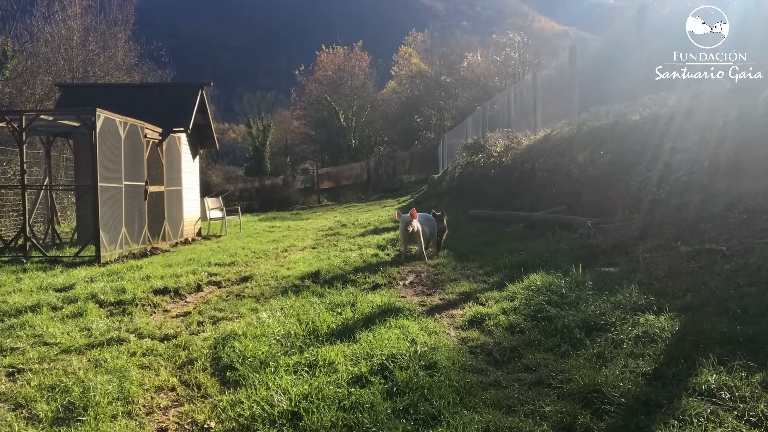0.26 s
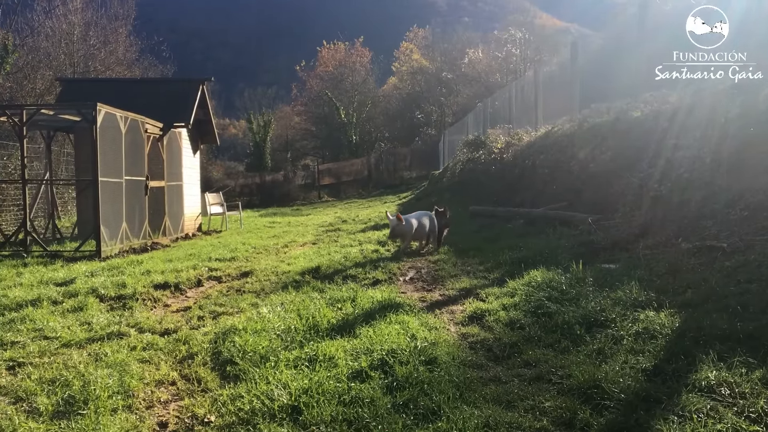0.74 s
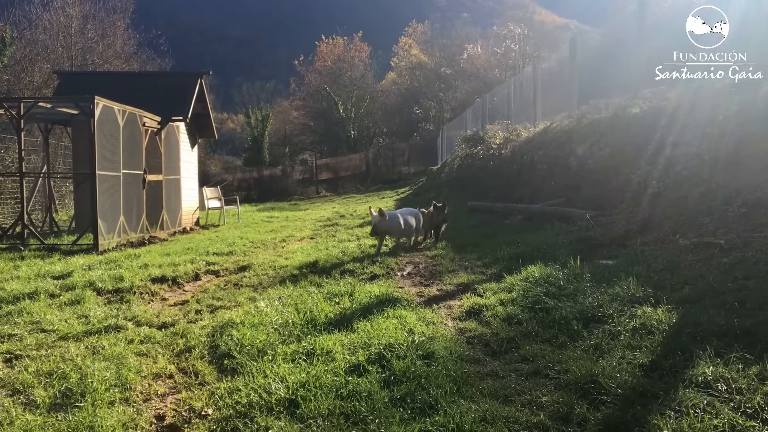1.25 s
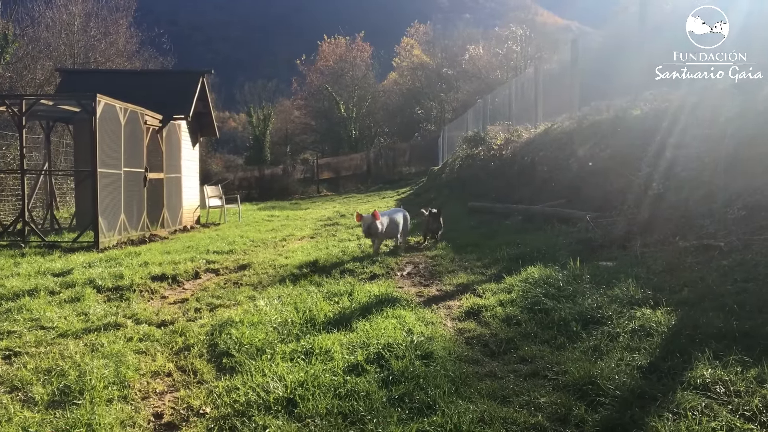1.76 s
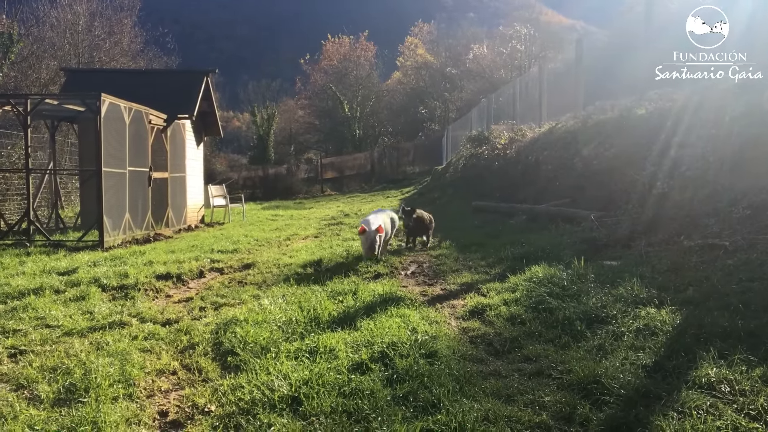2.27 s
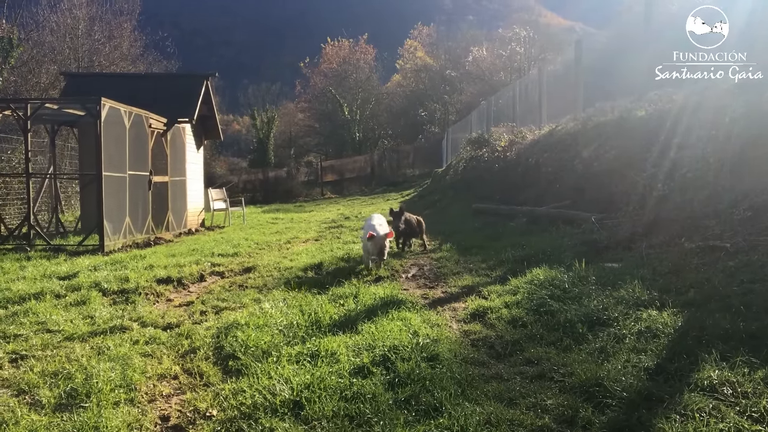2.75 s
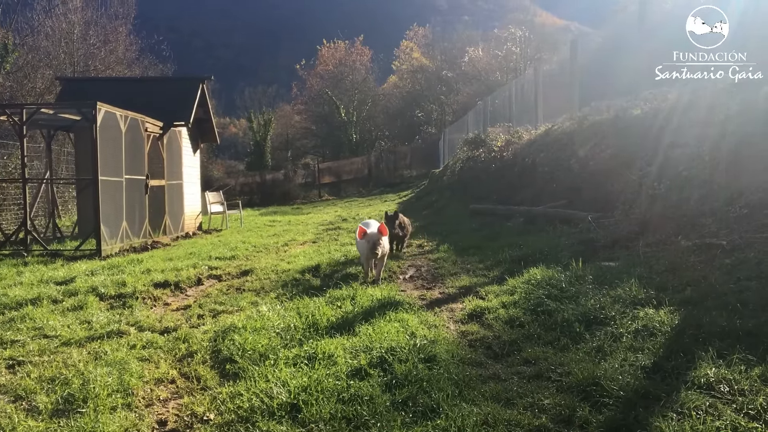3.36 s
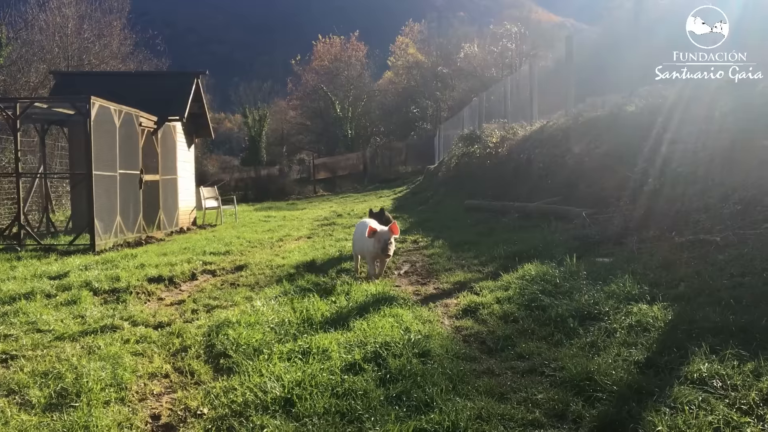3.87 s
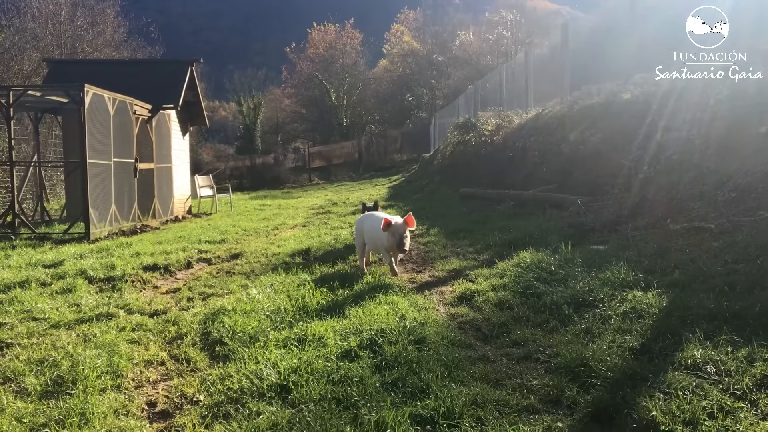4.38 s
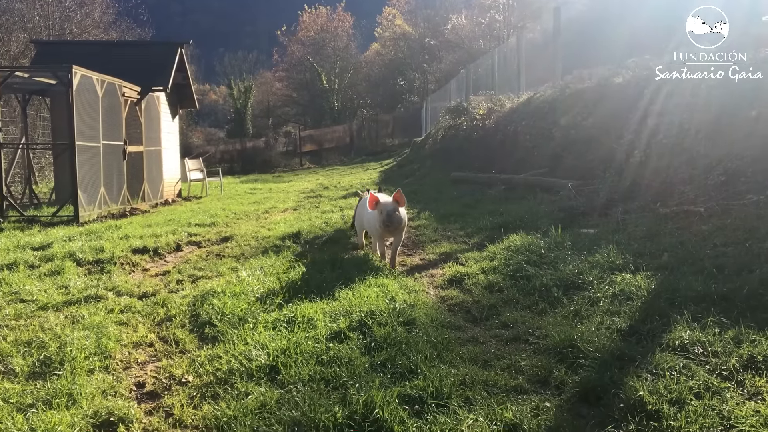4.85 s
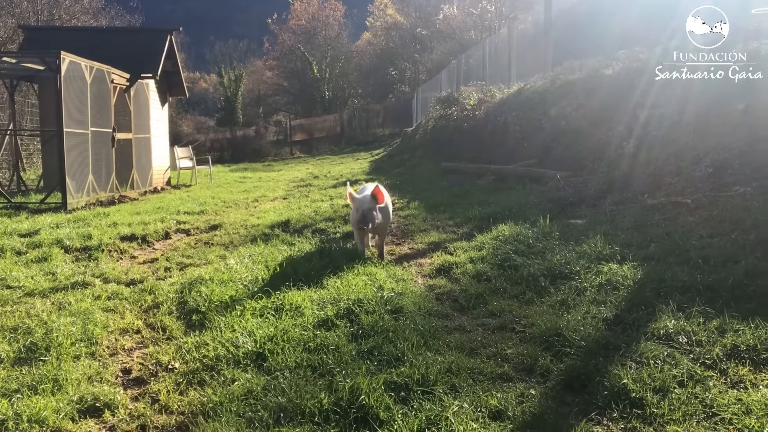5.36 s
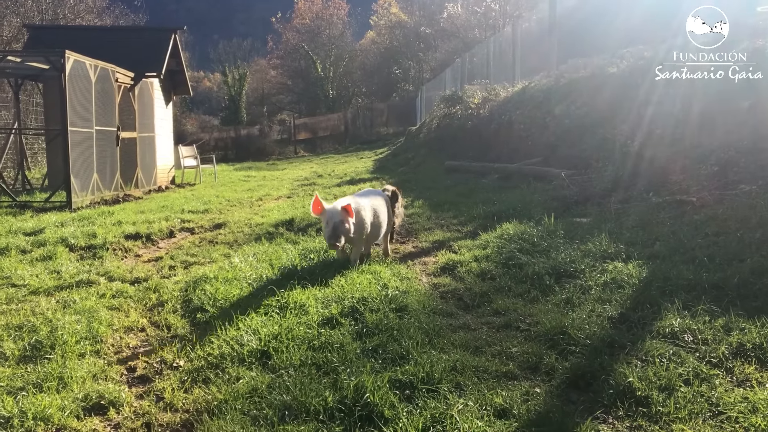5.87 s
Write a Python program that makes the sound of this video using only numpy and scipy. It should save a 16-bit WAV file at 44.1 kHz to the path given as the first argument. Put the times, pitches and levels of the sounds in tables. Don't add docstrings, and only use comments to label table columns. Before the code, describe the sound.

Outdoors in a quiet, open grassy paddock, pigs trot with irregular dull hoof thumps, crunching stems, snapping twigs and swishing blades. A faint low hum of a grunt comes midway, then a rattling throaty grunt later, followed by one loud stick crack with a heavy thump. A faraway livestock bell clinks now and then over soft air hiss and light low wind. Mono, small microphone with little deep bass.

```python
import sys
import numpy as np
from scipy import signal
from scipy.fft import rfft, irfft
from scipy.io import wavfile

SR = 44100
rng = np.random.default_rng(int(sys.argv[2]) if len(sys.argv) > 2 else 0)


def undo_db(level):
    steps = np.asarray(level, float) / 20
    return 10 ** steps


def dump_mix(stems):
    frames = np.atleast_2d(stems).T
    limited = np.clip(frames, -1, 1)
    pcm = np.round(limited * 32767).astype(np.int16)
    wavfile.write(sys.argv[1], SR, pcm)


N = 269892


def evened(x):
    return x / np.sqrt(np.mean(x ** 2) + 1e-20)


def curve(rows, column, t=None):
    rows = np.asarray(rows)
    if t is None:
        t = np.arange(N) / SR
    return np.interp(t, rows[:, 0], rows[:, column])


def coloured(x, points):
    f, db = np.transpose(points)
    hz = np.fft.rfftfreq(len(x), 1 / SR)
    gain = undo_db(np.interp(np.log(hz + 1), np.log(f + 1), db))
    return evened(irfft(rfft(x) * gain, len(x)))


def add(mix, start_s, sound):
    part = mix[round(start_s * SR):][:len(sound)]
    part += sound[:len(part)]


def resonate(x, hz, width_hz):
    turn = np.exp(2j * np.pi * np.cumsum(hz * np.ones(len(x))) / SR)
    r = np.exp(-np.pi * width_hz / SR)
    return 2 * (turn * signal.lfilter([1 - r], [1, -r], x / turn)).real


def steep(x, hz, width_hz):
    return evened(resonate(resonate(x, hz, width_hz), hz, width_hz))


def ring(hz, t60_s, rise_s, t):
    shape = (1 - np.exp(-(t / rise_s) ** 2)) * undo_db(-60 * t / t60_s)
    return shape / shape.max() * np.sin(2 * np.pi * hz * t)


def random_hits(per_s, spread_db):
    size = undo_db(spread_db * np.minimum(rng.exponential(1, N), 3))
    return size * (rng.random(N) < per_s / SR)


def grains(per_s, spread_db, length_s):
    age = np.arange(2000) / (length_s * SR)
    puffs = signal.oaconvolve(random_hits(per_s, spread_db), age * np.exp(-age))[:N]
    return evened(puffs * rng.standard_normal(N))


# f/Hz, level/dB per Hz
AIR_SPECTRUM = [(15, -42), (25, 4), (205, -4), (480, -12.5), (1110, -12.5), (2560, -19), (4500, -30.5),
                (15500, -54)]
# t/s, level/dB
WIND = [(0.0, -71), (0.2, -85.5), (2.44, -65), (2.59, -66), (2.8, -71), (4.24, -73.5), (4.5, -63),
        (4.99, -83), (6.12, -68.5)]


def air():
    hiss_db = -66.5
    wind_spectrum = [(15, -43.0), (35, -14.0), (65, -2.0), (110, -13), (200, -9.0), (400, -46.5)]
    hiss = coloured(rng.standard_normal(N), AIR_SPECTRUM)
    wind = coloured(grains(110, 1.0, 0.045), wind_spectrum)
    return undo_db(hiss_db) * hiss + undo_db(curve(WIND, 1) + 7.0) * wind


# t/s, level/dB
MOTION = [(0.0, -81), (0.75, -67.5), (0.99, -56.5), (1.43, -55.5), (1.76, -60), (1.92, -65.5), (2.04, -53),
          (2.42, -61), (2.8, -53), (3.08, -71), (3.46, -58.5), (3.54, -65.5), (4.18, -62), (4.64, -57),
          (4.91, -63.5), (5.69, -79), (5.88, -49.5), (6.12, -68.5)]


def follow(law):
    calm_db = -60
    level_db, slope = law
    return level_db + slope * (curve(MOTION, 1) - calm_db)


# centre t/s, half length/s, crunch level/dB, swish level/dB
STROKES = [(0.776, 0.012, -55, -81), (0.833, 0.044, -55, -68.5), (0.94, 0.065, -62, -64.5),
           (0.995, 0.044, -59.5, -74), (1.133, 0.027, -58, -69.5), (1.385, 0.073, -57, -86),
           (1.577, 0.033, -57.5, -69.5), (2.162, 0.054, -56.5, -71.5), (2.462, 0.054, -55.5, -65.5),
           (4.472, 0.045, -58.5, -65), (2.999, 0.034, -52, -68), (3.146, 0.034, -55.5, -66.5),
           (3.34, 0.076, -55.5, -67), (3.976, 0.027, -62.5, -73), (4.234, 0.15, -72, -71.5),
           (4.341, 0.05, -57, -62.5), (4.677, 0.043, -65, -63), (4.983, 0.029, -58, -76),
           (5.14, 0.046, -65, -77), (5.303, 0.078, -60.5, -73), (5.764, 0.096, -63.5, -68.5),
           (5.827, 0.071, -57, -68), (5.995, 0.038, -56, -63.5), (5.497, 0.11, -89, -71.5),
           (0.67, 0.025, -66, -85)]
# centre t/s, crunch level/dB, swish level/dB
FLICKS = [(1.302, -65, -73), (1.419, -50.5, -67.5), (1.675, -50.5, -82), (1.752, -56.5, -82.5),
          (1.984, -44.5, -65), (2.206, -58, -76), (2.31, -51, -64), (2.556, -55.5, -68), (2.631, -55, -63),
          (2.707, -52, -66), (2.868, -68, -80), (3.341, -47.5, -65), (3.452, -64, -82), (3.508, -55, -67),
          (3.561, -54, -63), (3.644, -60.5, -66.5), (3.743, -59, -82), (3.864, -63.5, -66),
          (3.922, -54, -69), (4.495, -64, -62), (4.772, -53, -61), (5.24, -67, -74), (5.316, -75, -72),
          (5.573, -73, -67.5)]


def brushing(law, column):
    flick_s = 0.011
    t = np.arange(N) / SR
    power = undo_db(2 * follow(law))
    flicks = [(s, flick_s, crunch_db, swish_db) for s, crunch_db, swish_db in FLICKS]
    for row in STROKES + flicks:
        centre_s, half_s = row[:2]
        first = max(round((centre_s - 4 * half_s) * SR), 0)
        near = slice(first, round((centre_s + 4 * half_s) * SR))
        power[near] += undo_db(2 * row[column]) * np.exp(-.8 * ((t[near] - centre_s) / half_s) ** 2)
    return np.sqrt(power)


def crackles():
    out = np.zeros(N)
    t = np.arange(900) / SR
    for hz in np.geomspace(700, 3800, num=16):
        out += signal.oaconvolve(random_hits(22, 4.3), ring(hz, 0.059, 0.00097, t))[:N]
    return evened(out)


# f/Hz, level/dB per Hz
CRUNCH = [(240, -78), (500, -5), (720, -0.5), (1290, -3), (1900, -4.5), (3000, -14), (7000, -41.5),
          (9100, -81)]
# f/Hz, level/dB per Hz
SWISH = [(1760, -79), (3150, -1.5), (5000, -6.5), (6010, -6), (9400, -7.5), (10400, -12), (11500, -8),
         (15800, -13)]
# level/dB at calm effort, slope/dB per dB of effort
BODY_FOLLOWS = (-62.5, 1.18)
CRUNCH_FOLLOWS = (-68.5, 0.45)
SWISH_FOLLOWS = (-73, 0.29)


def grass():
    body_hz, body_width_hz = 275, 60
    scuffs = grains(500, 4.7, 0.001)
    soft = grains(200, 2.3, 0.004) + 0.61 * rng.standard_normal(N)
    shaken = evened(resonate(resonate(soft, body_hz, body_width_hz), body_hz, 180.0))
    blades = 0.5 * scuffs + 0.5 * grains(210, 11.0, 0.00083) + rng.standard_normal(N)
    stems = 0.74 * scuffs + 0.18 * crackles() + 0.62 * rng.standard_normal(N)
    crunch_level = brushing(CRUNCH_FOLLOWS, column=2)
    swish_level = brushing(SWISH_FOLLOWS, column=3)
    body_level = np.hypot(undo_db(follow(BODY_FOLLOWS)), 0.75 * crunch_level)
    crunch = crunch_level * coloured(stems, CRUNCH)
    swish = swish_level * coloured(blades, SWISH)
    return body_level * shaken + crunch + swish


# f/Hz, t60/s
BELL = [(751, 0.7), (3440, 0.41), (4146, 0.19)]
# t/s, peak level/dB, middle partial relative level/dB, top partial relative level/dB
CLINKS = [(.127, -60.5, -14, -27), (1.302, -58.5, -8, -25.5), (2.434, -54, -25, -22),
          (2.981, -54.5, -20, -30), (3.447, -53, -18, -29.5), (4.028, -60.5, -16, -30.5),
          (4.248, -56, -30, -28.5), (4.633, -58, -22, -25), (5.004, -61.5, -9, -0.5),
          (5.497, -58, -16, -29), (6.013, -61.5, -17, -16)]


def bell():
    out = np.zeros(N)
    t = np.arange(SR // 2) / SR
    low, middle, top = (ring(hz, t60_s, 0.0043, t) for hz, t60_s in BELL)
    low = low * abs(1 + 0.16 * np.exp(2j * np.pi * 22 * t))
    for s, db, middle_db, top_db in CLINKS:
        add(out, s - .004, undo_db(db) * (low + undo_db(middle_db) * middle + undo_db(top_db) * top))
    return out


# t/s, peak level/dB, colour f/Hz
TICKS = [(0.6697, -52.5, 5400), (0.8178, -59, 5000), (0.8178, -47, 6130), (1.144, -51, 5400),
         (1.156, -51, 5580), (1.1757, -42, 5700), (1.2972, -51, 5290), (1.3576, -64, 5180),
         (1.5645, -47, 5740), (1.652, -46.5, 6340), (1.956, -44, 8400), (2.0346, -60, 6540),
         (2.104, -59, 5540), (2.212, -52, 5170), (2.289, -58, 6920), (2.306, -52, 6020),
         (2.4307, -57, 7120), (2.5998, -47, 11600), (2.711, -52, 5320), (2.7545, -53, 9400),
         (2.7817, -46.5, 6450), (2.8612, -56, 6060), (2.9562, -45, 6590), (2.9973, -41.5, 11700),
         (3.0963, -48, 5320), (3.253, -48, 7180), (3.313, -49, 5740), (3.3914, -57, 5640),
         (3.4374, -53, 5440), (3.5192, -51, 6130), (3.5621, -46, 6700), (3.6394, -63, 8360),
         (3.74, -52, 5310), (3.832, -44.5, 9550), (3.856, -45, 11700), (3.9986, -51, 9250),
         (4.2031, -50, 6320), (4.282, -43.5, 5630), (4.3185, -42, 11400), (4.3498, -43, 5910),
         (4.489, -38, 5210), (4.576, -45, 5290), (4.648, -56, 5120), (4.6732, -39, 6640), (4.72, -44, 8710),
         (4.7654, -45, 6800), (4.7683, -36, 5870), (4.8102, -38.5, 5870), (4.892, -49, 8850),
         (5.0158, -45, 8850), (5.097, -49, 9480), (5.3136, -54, 6920), (5.3914, -48, 8730),
         (5.4228, -53, 7510), (5.4738, -48, 11600), (5.503, -43.5, 12000), (5.548, -53, 9540),
         (5.561, -45, 6810), (5.7398, -39, 7380), (5.896, -49.5, 6260)]


def ticks():
    out = np.zeros(N)
    t = np.arange(900) / SR
    for s, db, hz in TICKS:
        noise = evened(resonate(rng.standard_normal(len(t)), hz, 3800))
        add(out, s - .001, undo_db(db - 0.5 - 60 * t / 0.013) * np.tanh(t / 0.0029) * noise)
    return out


# t/s, peak level/dB, ring f/Hz, treble relative level/dB
SNAPS = [(.767, -38.5, 1080, -18), (.999, -43.5, 1140, -4), (1.094, -36, 950, -10.5),
         (1.137, -36, 734, -13), (1.212, -46.5, 800, -9), (1.252, -37, 900, -15),
         (1.304, -43.5, 1100, -3.5), (1.357, -43, 3300, -5), (1.679, -39.5, 1280, -5.5),
         (2.209, -31, 1210, -11), (2.287, -46.5, 1397, 0.5), (2.308, -36.5, 1030, -2.5),
         (2.443, -40, 2120, -9), (2.468, -45, 3000, 0), (2.613, -44, 1100, -8), (3.024, -42, 1080, -6),
         (2.486, -40, 2100, 1), (3.394, -34, 850, -6), (5.986, -41, 2100, -16), (3.862, -43, 725, -5),
         (4.282, -41.5, 2040, -1.5), (4.331, -38, 790, -14), (4.491, -49, 1390, 9.5), (4.71, -42, 870, -21),
         (4.8105, -43, 1970, -3), (4.832, -43, 1250, -10), (5.3135, -49, 1480, -4),
         (5.324, -38.5, 1330, -20), (5.382, -41.5, 1070, -24.5), (5.715, -42, 774, -20),
         (3.7394, -38.5, 2530, 0.5), (3.3275, -42, 1060, -20), (1.4214, -47, 1300, -13),
         (3.5446, -43, 1090, -21)]
# t/s, peak level/dB, ring f/Hz
POPS = [(0.82, -34, 885), (0.931, -32.5, 1100), (1.488, -39, 760), (1.52, -35, 1080), (1.6613, -29.5, 1090),
        (1.7435, -30.5, 1080), (1.903, -41, 1570), (1.9562, -36.5, 1860), (1.9777, -30, 1340),
        (2.543, -38.5, 865), (2.6861, -31.5, 1460), (2.6938, -32, 1510), (2.711, -25.5, 950),
        (2.729, -36.5, 1240), (2.861, -39.5, 1020), (2.9848, -37.5, 1100), (3.005, -41, 1250),
        (3.263, -32, 1490), (3.295, -40, 1340), (3.3245, -34, 1950), (3.338, -32, 1150), (3.438, -29, 1790),
        (3.497, -32.5, 940), (3.513, -34.5, 1060), (3.531, -38.5, 997), (3.915, -40, 1040),
        (5.236, -36.5, 930), (5.9465, -41, 1980), (5.987, -38.5, 864),
        (0.743, -51, 1070), (0.784, -45, 1070), (1.008, -40.5, 1140), (1.055, -46, 1170),
         (1.125, -39, 776), (1.276, -45.5, 1420), (1.328, -45, 1440), (1.351, -41.5, 1680),
         (1.395, -49, 867), (1.571, -50, 1920), (1.591, -46, 1070), (1.686, -40.5, 2300),
         (1.7222, -48, 900), (1.825, -50.5, 1910), (1.886, -46.5, 1040), (2.03, -43, 818),
         (2.194, -47, 1280), (2.816, -49, 1900), (2.837, -47, 1100), (2.869, -38, 960), (2.946, -41.5, 993),
         (3.026, -40, 1420), (3.134, -40, 1040), (3.146, -38.5, 1050), (3.22, -42, 1010), (3.249, -40, 802),
         (3.303, -39, 1100), (3.379, -37, 1720), (3.7308, -46, 2200), (3.848, -52, 3330), (3.857, -59, 810),
         (4.428, -57, 1020), (4.692, -52, 864), (4.7608, -44, 1300), (4.925, -49, 1720), (4.941, -44, 1510),
         (4.956, -42.5, 1270), (5.144, -54, 1130), (5.217, -49, 1110), (5.353, -46, 1100),
         (5.689, -59, 872), (5.777, -46, 820), (5.969, -42, 886), (1.9865, -30.5, 1270),
         (4.7662, -36, 1700), (4.7585, -47, 2300), (4.753, -48, 2100), (3.7245, -50, 1500),
         (3.7465, -52, 1710), (3.7495, -51, 1390), (2.714, -35, 1230), (2.7068, -36, 1400),
         (1.6525, -49, 2000), (3.268, -35.5, 1000), (3.4058, -42, 1500), (2.5055, -40.5, 910),
         (2.2935, -46, 1400), (1.6705, -38, 1290), (1.9935, -45, 1880), (1.742, -36, 1940),
         (1.7475, -36.5, 720), (3.4413, -35, 1000)]
# f/Hz, level/dB, t60/s
STICK = [(590, -28.5, 0.013), (960, -24, 0.019), (1515, -19.5, 0.01), (1835, -16.5, 0.0047),
         (2770, -20, 0.0039), (3700, -24.5, 0.0037), (4880, -29, 0.0011)]


def snaps():
    dull_treble_db, stick_s = -50, 4.7697
    out = np.zeros(N)
    t = np.arange(2000) / SR
    stems = SNAPS + [(*row, dull_treble_db) for row in POPS]
    for s, db, hz, treble_db in stems:
        low, high = rng.standard_normal((2, len(t)))
        crack = ring(hz, 8.6 / hz + 0.0022, 0.00038, t)
        crack = crack + 520 / hz * ring(hz * 1.634, 0.0027, 0.00094, t)
        tail = steep(low, .5 * hz + 600, 930) * undo_db(-60 * t / 0.038) * np.tanh(t / 0.0024)
        edge = steep(high, 2760, 2130) * undo_db(-60 * t / 0.013) * np.tanh(t / 0.00061)
        add(out, s, undo_db(db - 1.0) * (crack + 0.27 * tail + undo_db(treble_db) * edge))
    add(out, stick_s, sum(undo_db(db) * ring(hz, t60_s, 0.00028, t) for hz, db, t60_s in STICK))
    return out


# t/s, peak level/dB, ring f/Hz, low push relative level/dB
THUMPS = [(0.801, -33.5, 263, -7), (.823, -33, 292, -4), (0.871, -35, 261, -11), (.936, -35, 292, -16),
          (1.017, -31.5, 248, -13), (1.093, -24.5, 275, -9.5), (1.127, -31, 249, -6.5),
          (1.215, -32.5, 268, -19), (1.253, -36, 285, -29), (1.322, -26.5, 275, -14),
          (1.435, -34, 264, -25), (1.549, -36, 290, -30), (1.887, -33, 267.6, -6.5),
          (1.948, -33.5, 275, -31), (1.961, -22, 282.6, -15), (1.988, -22, 282.6, -17),
          (2.214, -34.5, 275, -10.5), (2.6956, -23, 236.5, -34), (2.713, -20.5, 280.4, -10.5),
          (2.821, -36, 283.3, -25), (3.342, -39.5, 291, -9), (3.394, -37.5, 231, -30),
          (3.443, -36, 277, -30), (3.733, -40, 251, -24), (3.747, -32.5, 263, -9), (3.919, -32, 276, -36),
          (4.7737, -19.5, 279.3, -16.5), (5.794, -33, 275, -13), (5.97, -35.5, 285, -2),
          (6.067, -37, 273, -16)]
# t/s, peak level/dB, ring f/Hz
STEPS = [(0.894, -37, 292), (1.158, -35, 292), (1.408, -41, 293), (1.488, -38, 283), (1.666, -45, 276),
         (1.743, -44.5, 279), (1.918, -42, 268), (2.044, -38, 284), (2.279, -53, 243), (2.492, -42.5, 286),
         (2.619, -38.5, 275), (2.796, -38.5, 275), (2.858, -38.5, 265), (2.925, -42.5, 268),
         (2.967, -39, 275), (3.247, -43.5, 280), (3.499, -41.5, 275), (3.863, -39.5, 306), (3.89, -41, 296),
         (4.248, -44.5, 261), (4.732, -45, 267), (4.806, -43, 275), (4.967, -53, 275), (5.235, -46.5, 256),
         (5.326, -39.5, 275), (5.378, -48.5, 303), (5.617, -50.5, 296), (5.722, -38.5, 315),
         (5.834, -38, 278), (5.874, -49, 278),
         (0.77, -47, 268), (0.844, -45.5, 308), (0.921, -44, 288), (0.959, -45.5, 313),
          (0.979, -42.5, 277), (1.057, -47, 280), (1.109, -43, 246), (1.142, -36, 284), (1.176, -45, 286),
          (1.272, -41, 304), (1.364, -37.5, 283), (1.391, -42.5, 266), (1.457, -39, 284),
          (1.532, -44.5, 274), (1.579, -41, 288), (1.597, -43.5, 287), (2.106, -47, 279),
          (2.119, -43.5, 269), (2.159, -40, 282), (2.312, -45, 221), (3.141, -50, 240), (3.228, -51, 275),
          (3.263, -42.5, 250), (3.359, -46, 232), (3.577, -46, 274), (4.713, -49, 283), (5.708, -46, 322),
          (5.777, -40.5, 267), (5.812, -36.5, 272), (5.854, -37, 300), (5.889, -40, 285), (5.909, -48, 248),
          (5.937, -44, 276), (5.952, -45, 304), (5.981, -36.5, 242), (6.003, -38, 270), (6.044, -42.5, 260),
          (2.007, -32.5, 289), (2.688, -32, 267), (4.765, -35, 231), (1.412, -43, 283), (2.201, -41, 275),
          (2.731, -41, 290), (3.726, -46, 270)]
# level/dB, f/Hz, t60/s
KNOCK = (-43, 156, 0.035)


def thumps():
    step_push_db, knock_s = -12.5, 3.643
    out = np.zeros(N)
    t = np.arange(4400) / SR
    blows = THUMPS + [(*row, step_push_db) for row in STEPS]
    for s, db, hz, push_db in blows:
        a, b = rng.random(2)
        neighbour = .26 * ring(hz * (.76 + .3 * a), .12, .008, t)
        body = ring(hz, 0.077, 0.0036, t) + neighbour
        push = undo_db(push_db) * ring(130 + 50 * b, 0.034, 0.0076, t)
        add(out, s - .003, undo_db(db - 2.5) * (body + push))
    knock_db, knock_hz, knock_t60_s = KNOCK
    add(out, knock_s, undo_db(knock_db) * ring(knock_hz, knock_t60_s, .003, t))
    return out


# t/s, level/dB, pitch f/Hz
HUM = [
    (2.36, -70, 76.4),
    (2.474, -56.5, 68.3),
    (2.7, -64, 69),
]
# t/s, level/dB, throat factor, chest level/dB
GRUNT = [(4.36, -47, 0.75, -10), (4.39, -54.5, 0.98, -24), (4.42, -55, 0.93, 0), (4.48, -51.5, 0.92, 1),
         (4.57, -49, 0.955, -4), (4.595, -58, 1.2, -14), (4.615, -46.5, 1.065, -17), (4.645, -46, 0.92, -4),
         (4.68, -69, 2.3, -11)]
# t/s, pulse f/Hz
FOLDS = [(4.36, 32), (4.41, 33), (4.45, 46), (4.47, 32), (4.585, 32), (4.60, 48), (4.63, 37)]
# f/Hz, width/Hz, level/dB
THROAT = [
    (103, 56, 2.5),
    (223, 28, 5),
    (377, 79, -11),
]


def pig():
    out = np.zeros(N)
    t = np.arange(HUM[0][0], HUM[-1][0], 1 / SR)
    hum = np.sqrt(2) * np.sin(2 * np.pi * np.cumsum(curve(HUM, 2, t)) / SR)
    add(out, t[0], undo_db(curve(HUM, 1, t)) * hum * signal.windows.tukey(len(t), .15))

    t = np.arange(GRUNT[0][0], GRUNT[-1][0], 1 / SR)
    turns = np.cumsum(curve(FOLDS, 1, t)) / SR + .35
    pulses = np.diff(np.floor(turns), prepend=0)
    drive = pulses + 0.0058 * rng.standard_normal(len(t))
    factor = np.clip(curve(GRUNT, 2, t), .9, 1.12)
    bands = []
    for hz, width_hz, db in THROAT:
        band = resonate(resonate(drive, hz * factor, width_hz), hz * factor, 1.9 * width_hz)
        bands.append(undo_db(db) * evened(band))
    throat = undo_db(curve(GRUNT, 3, t)) * bands[0] + sum(bands[1:])
    add(out, t[0], undo_db(curve(GRUNT, 1, t)) * evened(throat) * signal.windows.tukey(len(t), .1))
    return out


# start t/s, peak level/dB, lower band f/Hz
RASPS = [(2.465, -47.5, 2000), (2.979, -50, 1870), (3.027, -48.5, 1860), (5.936, -51.5, 2000),
         (5.982, -49, 1950), (6.01, -54.5, 2300)]


def rasps():
    out = np.zeros(N)
    t = np.arange(1300) / SR
    swell = np.tanh(t / 0.006) * np.exp(-(t / 0.013) ** 2)
    for s, db, hz in RASPS:
        noise = rng.standard_normal(len(t))
        bands = steep(noise, hz, 410) + 0.58 * steep(noise, 1.646 * hz, 700)
        add(out, s, undo_db(db) * swell * bands)
    return out


def scene():
    return (air() + grass() + bell() + ticks() + snaps() + thumps() + pig() + rasps())[None]


def low_pass(x):
    return signal.sosfilt(signal.butter(12, 15930, fs=SR, output="sos"), x)


def record(dry):
    bass_cut = signal.sosfilt(signal.butter(2, 30, "high", fs=SR, output="sos"), dry)
    limited = signal.oaconvolve(bass_cut, signal.firwin(255, 15760, fs=SR)[None], "same")
    return low_pass(limited)


dry = scene()
out = record(dry)
dump_mix(out)
```